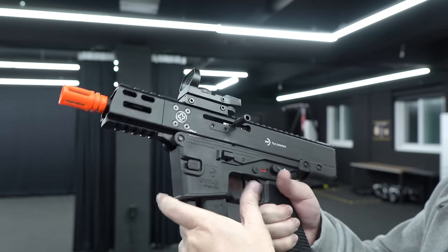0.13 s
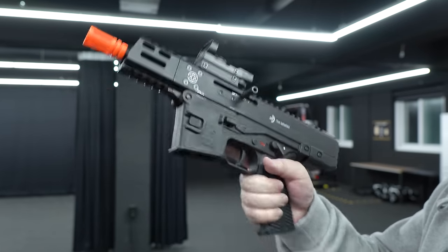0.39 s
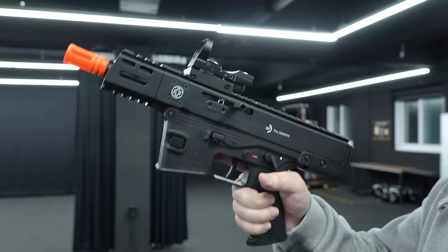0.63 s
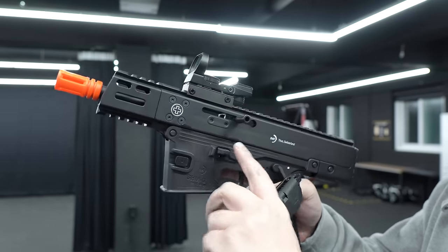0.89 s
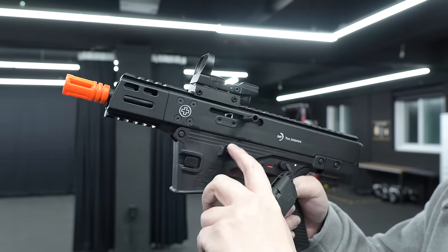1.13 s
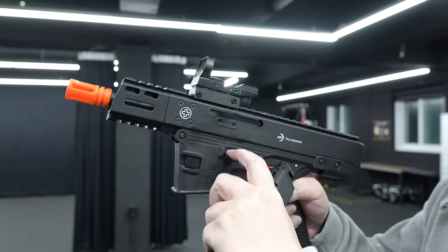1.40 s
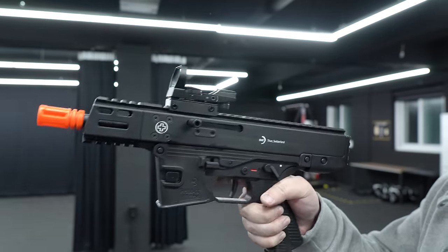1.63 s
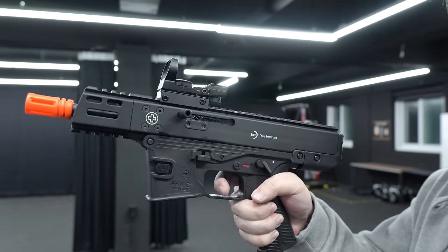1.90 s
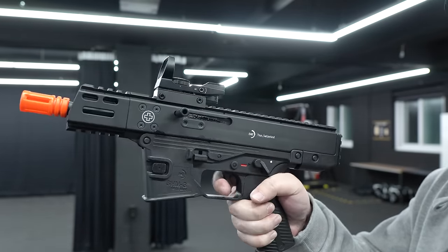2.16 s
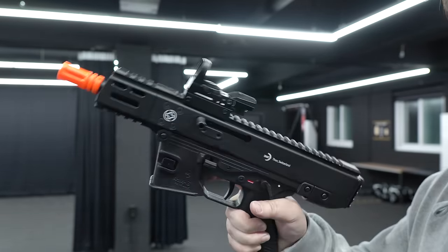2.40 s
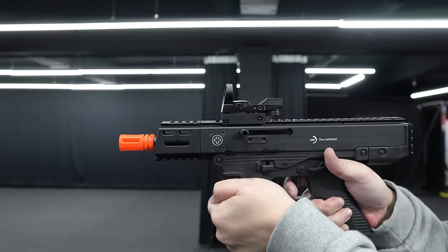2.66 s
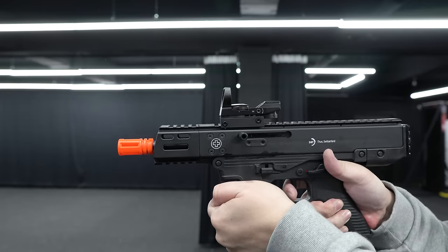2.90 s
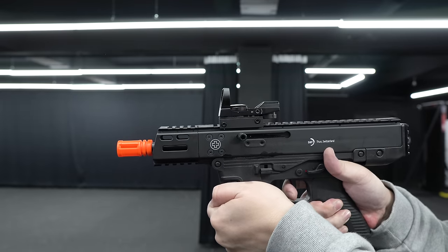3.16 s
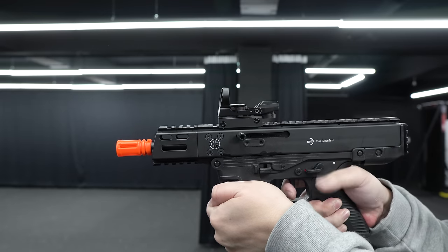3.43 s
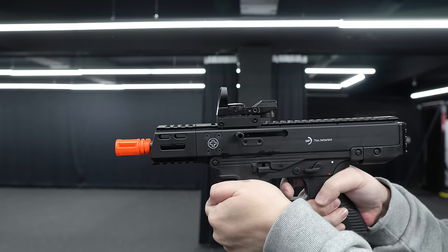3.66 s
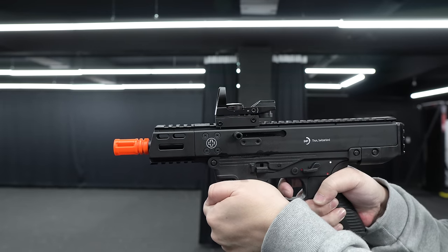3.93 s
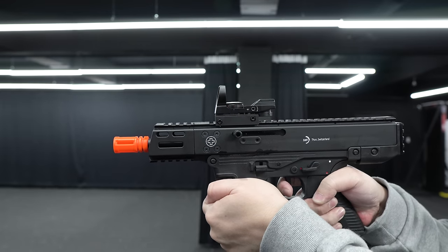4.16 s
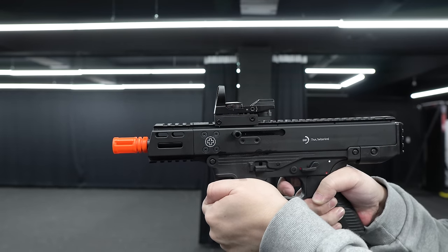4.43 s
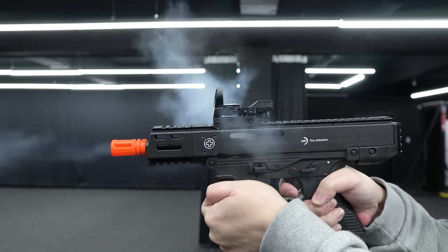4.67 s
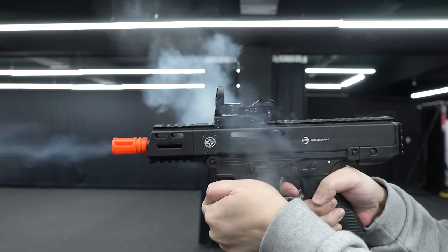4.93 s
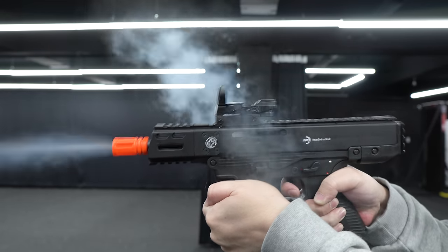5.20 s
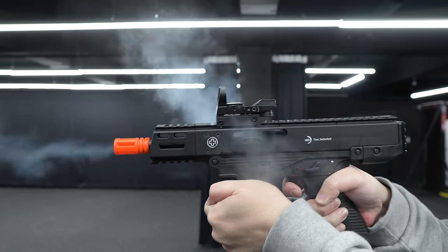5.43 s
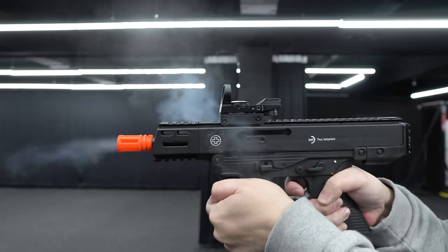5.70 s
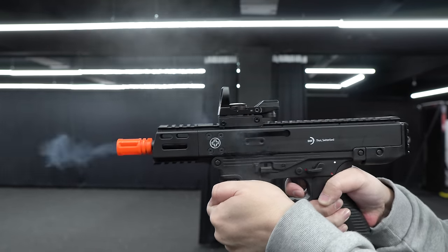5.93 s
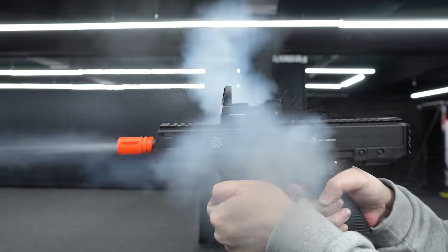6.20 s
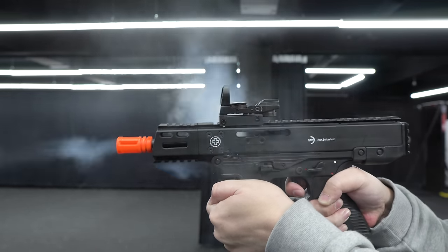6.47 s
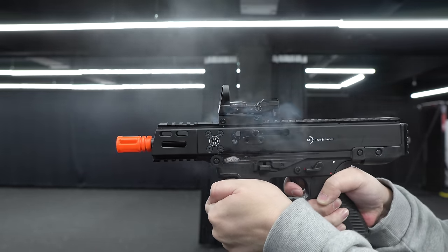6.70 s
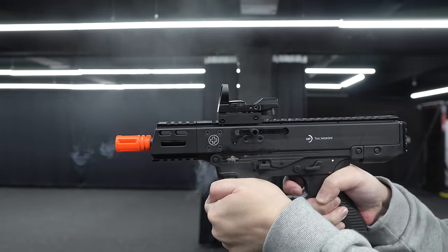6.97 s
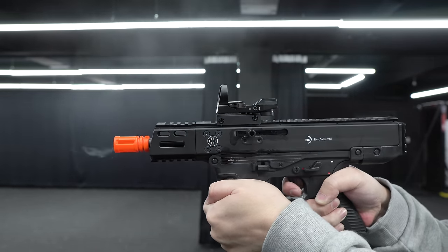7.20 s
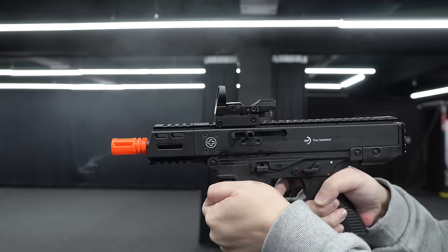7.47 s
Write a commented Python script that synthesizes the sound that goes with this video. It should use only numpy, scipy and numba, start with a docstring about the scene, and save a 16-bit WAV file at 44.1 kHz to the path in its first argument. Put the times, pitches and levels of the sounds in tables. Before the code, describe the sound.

Sharp metallic clicks over a faint lingering steel ring, an abrupt cut, then a two-second automatic airsoft burst slowing slightly, ending in a bolt-lock clack and hiss.

```python
"""A steel target is already ringing far off in a humming hall as a gas airsoft gun is handled and dry-clicked.
After a cut to another moment there, it empties its magazine in one burst, mostly slowing as the gas chills.
Clicks and bolt blows are short filtered noise, the gas is grainy noise through resonances, the steel is decaying
sines and the hall is fresh noise shaped by band energy. The input stage clips and ducks the loudest blows."""
import sys
import numpy as np
from scipy import signal
from scipy.fft import rfft, irfft
from scipy.io import wavfile
from scipy.ndimage import uniform_filter1d, minimum_filter1d
from numba import njit

SR = 44100
rng = np.random.default_rng(int(sys.argv[2]) if len(sys.argv) > 2 else 0)


def pcm_store(signal):
    """Save signal as 16-bit PCM."""
    levels = np.round(np.clip(np.atleast_2d(signal), -1, 1) * 32767)
    wavfile.write(sys.argv[1], SR, levels.astype(np.int16).T)


def boost_factor(decibels):
    """Convert a level in decibels to a linear amplitude factor."""
    exponent = np.asarray(decibels, float) / 20
    return 10 ** exponent


N = 334719
t = np.arange(N) / SR
CUT_S = 2.665  # the edit between two moments in the same hall


def unit(x):
    """Scale to rms 1."""
    return x / np.sqrt(np.mean(x ** 2))


def band(x, hz, width):
    """Two-pole resonance, gain 1 at the centre."""
    return signal.lfilter(*signal.iirpeak(min(hz, .45 * SR), hz / width, fs=SR), x)


def steep_band(x, hz, width):
    """The same resonance twice in a row, for steeper skirts."""
    return band(band(x, hz, width), hz, width)


def resonate(x, modes):
    """Sum of resonances with alternating sign."""
    return sum((-1) ** k * boost_factor(db) * band(x, hz, w) for k, (hz, w, db) in enumerate(modes))


def ring(x, modes):
    """Long modes struck by x, each a decaying sine."""
    out = 0
    for hz, db, t60 in modes:
        pole = np.exp((2j * np.pi * hz - np.log(1000) / t60) / SR)
        out = out + boost_factor(db) * signal.lfilter([1], [1, -pole], x).imag
    return out


def add(out, s, x):
    """Mix x into out from time s."""
    i = int(s * SR)
    out[i:i + len(x)] += x[:len(out) - i]


def knock(noise, db, hz, t60_ms, rise_ms=.19):
    """A short rattling contact of one colour, with a broad edge; db is its peak."""
    ms = t[:len(noise)] * 1000
    rattle = noise * boost_factor(-60 * ms / t60_ms) * np.minimum(ms / rise_ms, 1)
    y = steep_band(rattle, hz, 1.35 * hz) + 0.01 * np.diff(rattle, prepend=0)
    return boost_factor(db) * y / np.abs(y).max()


def grains(spread_db, size):
    """Noise whose level jumps from grain to grain (size in samples), with a few loud ones."""
    jumps = np.minimum(rng.exponential(size=N // size + 1), 4).repeat(size)[:N]
    return rng.standard_normal(N) * boost_factor(spread_db * jumps)


def walk(rate):
    """Random levels held 1 / rate s and slewed twice; spread near 1."""
    k = int(SR / rate)
    steps = np.repeat(rng.standard_normal(N // k + 1), k)
    return 0.88 * uniform_filter1d(uniform_filter1d(steps, k), k)[:N]


@njit
def follow(x, attack, release):
    """Envelope that rises fast and falls slowly."""
    e, out = 1e-9, np.empty(len(x))
    for i in range(len(x)):
        e += (abs(x[i]) - e) * (attack if abs(x[i]) > e else release)
        out[i] = e
    return out


# rounds fired: (time [s])
ROUND_TIMES = [4.5492, 4.639, 4.7097, 4.777, 4.8462, 4.9165, 4.9843, 5.0566, 5.1262, 5.2014, 5.2692, 5.3398,
               5.4134, 5.4814, 5.5538, 5.6253, 5.7092, 5.7857, 5.8692, 5.9448, 6.03, 6.113, 6.1938, 6.2806,
               6.3584, 6.4429, 6.511, 6.5823]
# parts of one firing cycle: (level re the blow [dB], colour [Hz], t60 [ms], rise [ms])
CYCLE_PARTS = [(-0.5, 11000, 11, 1.5), (6.5, 4300, 14, 1.8), (-4, 760, 56, 1.1), (3, 3750, 21, 1.2),
               (0, 4500, 60, 2.5), (2.5, 13000, 20, 2.5)]
# when each of those parts starts: (delay after the round [ms])
CYCLE_DELAYS = [1.6, 1.2, 2, 6.5, 12, 12]
# force of a round as the magazine chills: (time [s], blow [dB], thump [dB], gas [dB])
ROUND_FORCE = [(4.55, 6, -4, -9), (5.2, 5.5, -6.5, -9.5), (6.2, 8, -9.5, -6), (6.44, 2.5, -11.5, -8.5),
               (6.581, -6, -15.5, -13)]
# receiver and barrel shroud: (frequency [Hz], width [Hz], relative level [dB])
BODY_MODES = [(704, 80, -9.5), (1040, 130, -15.5), (1820, 1300, 9.5), (2180, 96, -3), (2670, 80, 0.5),
              (3080, 22, -1), (3470, 710, 7), (3850, 260, -1.5), (4000, 300, -7.5), (4640, 230, 2),
              (4970, 51, -14), (6600, 460, -20), (10800, 2500, -25)]
# low modes of the hall: (frequency [Hz], width [Hz], relative level [dB])
BOOM_MODES = [(45.2, 16, -4), (115.8, 21, 1), (164, 30, -1), (255.6, 23, 8), (555, 100, 0)]
# muzzle gas: (frequency [Hz], width [Hz], relative level [dB])
GAS_MODES = [(644, 450, -5), (1330, 600, 0), (3530, 1100, 3.5), (6000, 780, 0.5), (12800, 6000, -15)]
ALIKE = .8  # share of a round's rattle that repeats in every round
SCATTER_DB = 1.5  # round to round
THUMP_DELAY_MS, BOOM_DELAY_MS = 14, 46
THUMP_HZ, THUMP_WIDTH_HZ, THUMP_DB = 230, 260, 11.5
BOOM_DB = 5.5  # the thump returns from the walls and rings the hall's low modes
THUMP_HALL_DB = -5.5  # share of the thump that feeds the diffuse echo
GAS_RISE_S, GAS_FADE_S = .02, .075


def burst():
    """Each round: valve crack, muzzle pop, bolt blow, thump and gas puff; row two goes out to the hall."""
    out, push, puff = bolt(), np.zeros(N), np.zeros(N)
    when, *force = np.transpose(ROUND_FORCE)
    same = rng.standard_normal((len(CYCLE_PARTS), 2048))
    swell = np.exp(-t[:8192] / GAS_FADE_S) * (1 - np.exp(-t[:8192] / GAS_RISE_S))
    for s in ROUND_TIMES:
        scatter = SCATTER_DB * rng.standard_normal(3)
        blow_db, thump_db, gas_db = [np.interp(s, when, f) for f in force] + scatter
        rattle = ALIKE * same + np.sqrt(1 - ALIKE ** 2) * rng.standard_normal(same.shape)
        for ms, (part_db, hz, t60_ms, rise_ms), noise in zip(CYCLE_DELAYS, CYCLE_PARTS, rattle):
            add(out, s + ms / 1000, knock(noise, blow_db + part_db, hz, t60_ms, rise_ms))
        add(push, s + THUMP_DELAY_MS / 1000, boost_factor(thump_db) * np.hanning(120))
        add(puff, s, boost_factor(gas_db) * swell)
    thump = boost_factor(THUMP_DB) * band(push, THUMP_HZ, THUMP_WIDTH_HZ)
    add(thump, (BOOM_DELAY_MS - THUMP_DELAY_MS) / 1000, boost_factor(BOOM_DB) * resonate(push, BOOM_MODES))
    # loose parts chatter, so the gas noise is grainy
    gas = puff * unit(resonate(grains(3.4, size=90), GAS_MODES))
    return out + .5 * resonate(out, BODY_MODES) + gas + boost_factor([[0], [THUMP_HALL_DB]]) * thump


# ring of the bolt's stops: (frequency [Hz], width [Hz], relative level [dB])
BOLT_MODES = [(6270, 280, 5.5), (7940, 280, 8.5), (12000, 6000, -1.5)]
BOLT_JITTER_MS, BOLT_SCATTER_DB, BOLT_T60_MS = 1.3, 5, 13
REAR_MS, REAR_DB, REAR_DB_PER_S, REAR_TOP_DB = 37, -12, 13, 4
STRIP_MS, STRIP_DB, STRIP_HZ = 54, -11.5, 3300
# the slam leads the next round by this share of the gap between rounds
SHUT_SHARE, SHUT_DB, SHUT_DB_PER_S = .155, 6, -4.5


def bolt():
    """Rear stop, pellet feed and closing slam, as knocks between each round and the next."""
    stops, feed = np.zeros(N), np.zeros(N)
    for s, then in zip(ROUND_TIMES, ROUND_TIMES[1:]):
        noise = rng.standard_normal((3, 1024))
        late = BOLT_JITTER_MS / 1000 * rng.standard_normal(3)
        db = BOLT_SCATTER_DB * rng.standard_normal(3)
        since = s - ROUND_TIMES[0]
        rear_db = min(REAR_DB + REAR_DB_PER_S * since, REAR_TOP_DB) + db[0]
        shut_db = SHUT_DB + SHUT_DB_PER_S * since + db[2]
        shut_s = then - SHUT_SHARE * min(then - s, .085) + late[2] / 2
        add(stops, s + REAR_MS / 1000 + late[0], knock(noise[0], rear_db, 7000, BOLT_T60_MS))
        add(feed, s + STRIP_MS / 1000 + late[1], knock(noise[1], STRIP_DB + db[1], STRIP_HZ, BOLT_T60_MS))
        add(stops, shut_s, knock(noise[2], shut_db, 7000, BOLT_T60_MS))
    return resonate(stops, BOLT_MODES) + feed


# the leak that hisses on afterwards: (time [s], flow level [dB])
LEAK_FLOW = [(6.66, -39.5), (6.712, -37), (7.031, -38), (7.071, -44.5), (7.27, -52), (7.289, -45.5),
             (7.59, -48)]
# the cold valve spits after some rounds: (time [s], flow level [dB], t60 [s])
VALVE_SPITS = [(6.215, 4.5, .09), (6.234, -18.5, 0.22), (6.458, -5.5, 0.19), (6.509, -15, 0.45),
               (6.589, -10, 0.18)]
# the valve's narrow passages: (frequency [Hz], width [Hz], relative level [dB])
VALVE_MODES = [(990, 500, -0.5), (3100, 160, 8), (6000, 430, 0.5), (7930, 700, -1.5), (10600, 1600, -2),
               (14500, 2500, -4.5)]
SPIT_RISE_MS = 4.4


def vent():
    """Hiss through the valve's narrow passages, fluttering a little."""
    s, db = np.transpose(LEAK_FLOW)
    flow = boost_factor(np.interp(t, s, db, left=-120))
    for s, db, t60 in VALVE_SPITS:
        rise = np.minimum(t[:SR] * 1000 / SPIT_RISE_MS, 1)
        add(flow, s, boost_factor(db - 60 * t[:SR] / t60) * rise)
    passages = unit(resonate(rng.standard_normal(N), VALVE_MODES))
    hiss = passages + 0.71 * band(rng.standard_normal(N), 9000, 15000)
    return flow * boost_factor(0.5 * walk(23)) * hiss


# hands on levers, catch and trigger, some wall echoes, and the bolt's last rear knock and its locking back:
# (time [s], peak level [dB], colour [Hz], thud level re click, before its filter [dB])
GUN_CLICKS = [(0.1228, -29.5, 2646, -15), (0.2116, -46.5, 1846, -15), (0.3058, 0.5, 5880, -29),
              (0.3084, -17, 3790, -15.5), (0.335, -14.5, 5440, -5.5), (0.378, -17, 3140, -8),
              (0.3898, -8, 2588, -9.5), (0.3954, -20.5, 2700, -23.5), (0.5707, -38, 2310, -29),
              (0.5931, -35.5, 1490, -9), (0.614, -41.5, 1500, -22), (0.7374, -26.5, 2840, -21.5),
              (0.7444, -32.5, 4000, -19), (1.1031, -49.5, 2233, -16), (1.2141, -40, 2140, -2.5),
              (1.389, -49.5, 2365, -11), (1.412, -40, 3850, -13), (1.424, -28, 3110, -23),
              (1.4334, 10.5, 3472, -22), (1.4354, 8.5, 3198, -22.5), (1.4885, 13, 4480, -15),
              (1.492, 11, 4435, -25), (1.5146, 0, 3936, -11.5), (1.5346, -4, 4260, -11),
              (1.6655, -13, 2600, -27), (1.768, -21, 2836, -10), (1.7824, -27, 2966, -13.5),
              (2.0466, -16.5, 4093, -6), (2.053, 10, 4985, -24.5), (2.0545, 14, 4290, -15.5),
              (2.2341, -23, 2000, -11), (2.3621, -7.5, 3730, -27), (3.459, -40.5, 4020, -8),
              (4.5121, -45, 3150, 9), (4.536, -27.5, 3010, -7.5), (6.6232, 7.5, 3480, -10.5),
              (6.64, 4, 5910, -18), (6.649, 4, 7950, -16), (6.7216, -22.5, 3620, 4),
              (7.0423, -7.5, 4780, -16), (7.0952, -22.5, 2590, -2), (7.283, -33, 3020, -4)]
# fingers and parts sliding, and one faint stretch of hiss (the one from 1.699 s):
# (start [s], end [s], rms level before the fades [dB], colour [Hz])
GRAINY_STRETCHES = [(0.307, 0.394, -35.5, 3022), (0.329, 0.40, -42.5, 400), (.53, 0.603, -54, 6000),
                    (0.948, .985, -62, 3500), (1.026, 1.06, -65, 3200), (1.178, 1.205, -66, 2994),
                    (1.699, 2.04, -64, 4940), (3.455, 3.56, -71, 4000), (2.461, 2.664, -62, 9940)]
# pins and levers that ring on after a click: (frequency [Hz], level [dB], t60 [s])
PIN_MODES = [(3230, -54, .18), (3740, -59, .15), (4377, -53, .2), (5001, -52, .14), (5270, -55, .2),
             (5771, -54, .25)]
CLICK_T60_MS, CLICK_HALL_DB, BODY_SHARE_DB = 13, -4, -11


def handling():
    """Clicks over hollow thuds, grainy sliding and a faint hiss; row two is what goes out to the hall."""
    clicks, rubs = np.zeros(N), np.zeros(N)
    for s, db, hz, thud_db in GUN_CLICKS:
        noise = rng.standard_normal(2048)
        thud = steep_band(knock(noise[::-1], db + thud_db, 800, 40), 800, 800)
        add(clicks, s, knock(noise, db, hz, CLICK_T60_MS) + thud)
    grit = grains(2.5, size=60)
    for start, end, db, hz in GRAINY_STRETCHES:
        i, j = int(start * SR), int(end * SR)
        stretch = unit(band(grit[i:j], hz, 1.2 * hz))
        rubs[i:j] += boost_factor(db) * stretch * signal.windows.tukey(j - i, .3)
    out = np.array([clicks + rubs, boost_factor(CLICK_HALL_DB) * clicks + rubs])
    return out + boost_factor(BODY_SHARE_DB) * resonate(out, BODY_MODES) + ring(clicks, PIN_MODES)


# steel target: (frequency [Hz], relative level [dB], t60 [s])
STEEL_MODES = [(1434, 0, 7.8), (2484, -20, 4.5), (3052, -34, 6)]
# how hard the target rings: (already at the start [dB], each pellet [dB])
STEEL_LEVELS = (-42, -58)
# a small part that rings once the bolt locks: (frequency [Hz], level [dB], t60 [s])
SPRING_MODES = [(7510, -25, .45), (7570, -27, .4)]
LOCK_S = 6.645


def steel():
    """The target sings before the cut, pellets set it going again, and a small part rings at the bolt lock."""
    first, pellets, lock = np.zeros(N), np.zeros(N), np.zeros(N)
    first[0], lock[int(LOCK_S * SR)] = boost_factor(STEEL_LEVELS[0]), 1
    pellets[(np.array(ROUND_TIMES) * SR).astype(int)] = boost_factor(STEEL_LEVELS[1])
    # pellets land at any phase of the ring; on average its swing grows with each
    grown = np.zeros(N)
    for hz, db, t60 in STEEL_MODES:
        swing = signal.lfilter([1], [1, -boost_factor(-60 / t60 / SR)], pellets)
        grown += boost_factor(db) * np.sin(2 * np.pi * hz * t) * swing
    return ring(first, STEEL_MODES) * (t < CUT_S) + grown + ring(lock, SPRING_MODES)


# hall echo: (frequency [Hz], t60 [s], level [dB])
HALL_DECAY = [(60, 1.4, 0.5), (237, 1.8, -1.5), (450, 1, -8), (795, 0.95, -12.5), (1420, 0.54, -9),
              (2760, 0.45, -15.5), (4740, .42, -11), (7500, 0.3, -16), (12000, .28, -17)]
HALL_RISE_MS = 14
WALL_MS, WALL_DB, WALL_SMEAR_MS = 30, -14.5, 6


def hall(x):
    """Diffuse echo: each band's energy builds and dies away as fresh noise; the nearest wall slaps back."""
    hz, t60, db = np.transpose(HALL_DECAY)
    cut, rise, out = int(CUT_S * SR), np.exp(-1000 / HALL_RISE_MS / SR), np.zeros(N)
    scatter = grains(1.5, size=120)  # single reflections stand out of the wash
    for k, f in enumerate(62.5 * 2 ** np.arange(0, 8, .5)):
        keep = boost_factor(-120 / np.interp(np.log(f), np.log(hz), t60) / SR)  # energy left after one sample
        gain, poles = (1 - keep) * (1 - rise), np.convolve([1, -keep], [1, -rise])
        # the echo starts afresh at the cut
        parts = np.split(steep_band(x, f, f / 2) ** 2, [cut])
        energy = np.concatenate([signal.lfilter([gain], poles, e) for e in parts])
        noise = unit(steep_band(scatter, f, f / 2))
        level = boost_factor(np.interp(np.log(f), np.log(hz), db))
        out += (-1) ** k * level * np.sqrt(np.abs(energy)) * noise
    wall = np.zeros(4096)
    smear = np.exp(-t[:600] * 1000 / WALL_SMEAR_MS)
    add(wall, WALL_MS / 1000, rng.standard_normal(600) * smear)
    slap = band(wall, 4500, 4100) / np.sqrt(np.sum(wall ** 2))
    return out + boost_factor(WALL_DB) * signal.fftconvolve(x, slap)[:N]


# spectrum of the ventilation rumble: (frequency [Hz], relative density [dB per Hz])
RUMBLE_SHAPE = [(18, -35.5), (30, -5.5), (71, -10.5), (90, -14), (108, 0.5), (202, -10), (237, -12.5),
                (308, -11), (432, -20.5), (468, -22.5), (876, -26.5), (3410, -34.5), (15600, -42)]
# fan tones, one list before and one after the cut: (frequency [Hz], rms level [dB]), both wavering
FAN_TONES = [
    [(64.6, -62), (118.4, -67), (279.9, -61.5), (419.9, -74), (839.8, -84.5)],
    [(64.6, -59.5), (118.4, -64), (204.6, -63), (301.5, -71), (473.7, -79), (818.3, -83.5)],
]
RUMBLE_DB = -58


def air():
    """Ventilation rumble as shaped noise, and fan tones as sines of wavering pitch and level."""
    hz, db = np.transpose(RUMBLE_SHAPE)
    f = np.maximum(np.fft.rfftfreq(N, 1 / SR), 1)
    shape = boost_factor(np.interp(np.log(f), np.log(hz), db))
    rumble = boost_factor(RUMBLE_DB + walk(1.0)) * unit(irfft(rfft(rng.standard_normal(N)) * shape, N))
    fans = np.zeros((2, N))
    for fan, lines in zip(fans, FAN_TONES):
        for hz, db in lines:
            phase = 2 * np.pi * np.cumsum(hz + 4.54 * walk(9.1)) / SR
            fan += boost_factor(db + 2 * walk(3.8)) * np.sqrt(2) * np.sin(phase)
    return rumble + np.where(t < CUT_S, *fans)


def scene():
    """The gun in the hall, the target and the air."""
    near, far = burst() + vent() + handling()
    return (near + hall(far) + steel() + air())[None]


def roll_off(x):
    """The treble ends steeply here."""
    return signal.sosfilt(signal.butter(12, 15710, fs=SR, output="sos"), x)


CEILING = 1.6  # the input stage holds peaks here before it clips


def record(dry):
    """The input stage rides the average, holds peaks and clips; a limiter then ducks within milliseconds."""
    ride = follow(np.clip(dry[0], -2.5, 2.5), 1 / (.03 * SR), 1 / (.25 * SR))
    hot = dry[0] * np.minimum(0.065 / ride, 1) ** 0.29
    hold = np.minimum(CEILING / (np.abs(hot) + 1e-9), 1)
    hold = uniform_filter1d(minimum_filter1d(hold, size=41), size=41)
    hot = np.clip(hot * hold, -1.0, 1.0)
    loud = follow(hot, 1 / (0.0054 * SR), 1 / (0.011 * SR))
    limited = hot * np.minimum(0.26 / loud, 1)
    mix = signal.lfilter(*signal.butter(1, 45, 'high', fs=SR), limited)  # the bass is rolled off
    return roll_off(mix[None])


dry = scene()
out = record(dry)
pcm_store(out)
```